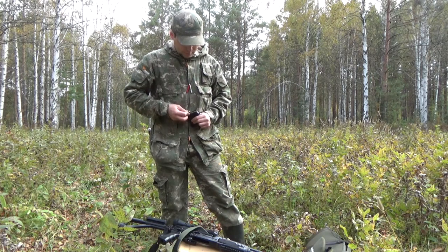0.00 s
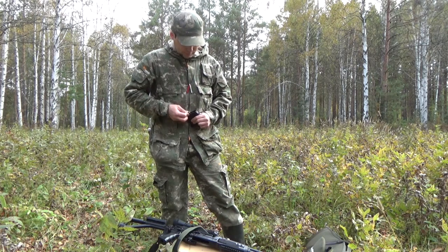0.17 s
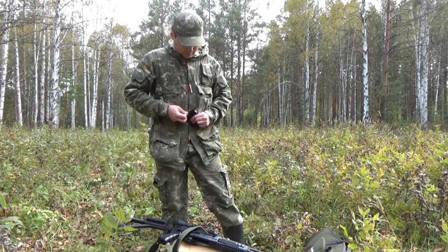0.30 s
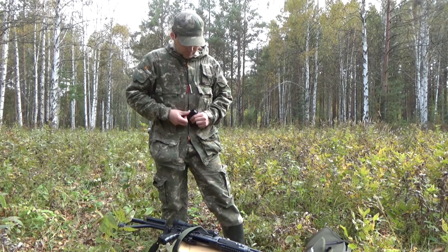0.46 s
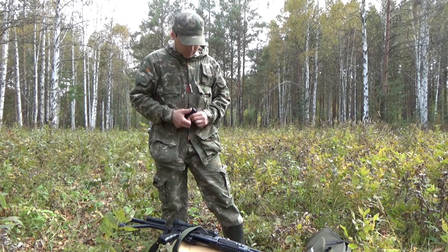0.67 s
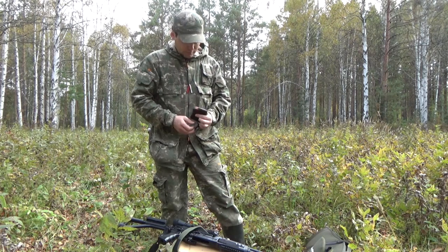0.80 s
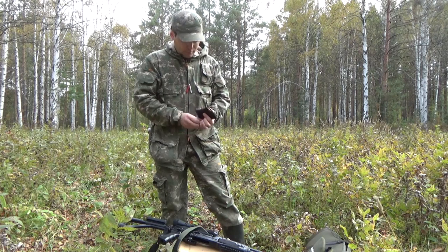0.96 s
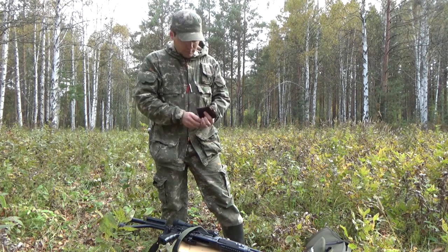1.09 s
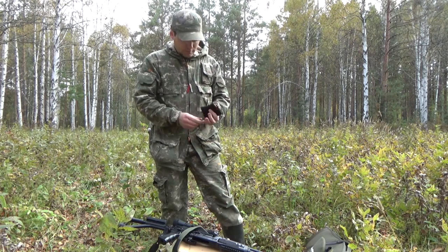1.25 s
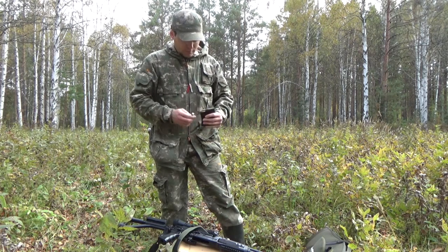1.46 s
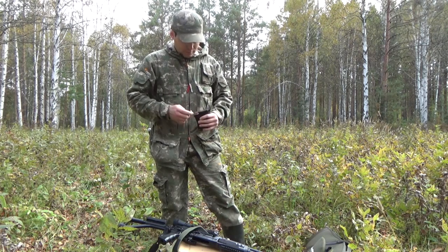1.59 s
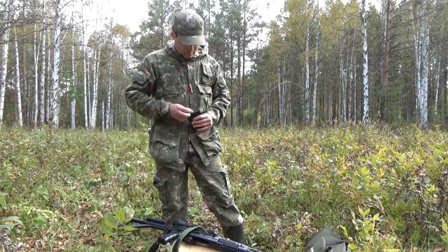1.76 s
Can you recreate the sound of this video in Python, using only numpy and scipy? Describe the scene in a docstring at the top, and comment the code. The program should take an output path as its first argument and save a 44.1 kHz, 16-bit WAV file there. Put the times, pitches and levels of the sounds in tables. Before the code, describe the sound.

A cartridge is loaded into a hand-held magazine: light taps and short scrapes from 0.07 to 0.32 s, a loud bright metallic snap at 0.43, another click near 0.55, and a tight cluster of dry clicks at 0.60-0.66. Sleeves rustle, strongest around 0.5-0.8. Barely audible contacts come at 1.0, 1.41 and 1.48. Faint wind, hiss and rapid tiny ticking continue throughout, with a slight woodland echo.

```python
"""Light wind murmurs far off, ticks run very faintly and sleeves rustle in a forest clearing throughout.
A rifle cartridge taps the feed lips of a hand-held magazine, scrapes, snaps under them and is pushed home
in a few dry clicks; three faint contacts follow. Contacts are treble cracks, damped metal modes and thuds;
scrapes, cloth, ticks and wind are shaped noise. Undergrowth and trees return a faint noise-tail echo."""
import sys
import numpy as np
from scipy import signal
from scipy.fft import rfft, irfft, next_fast_len
from scipy.io import wavfile
from scipy.ndimage import map_coordinates

SR = 44100
rng = np.random.default_rng(int(sys.argv[2]) if len(sys.argv) > 2 else 0)


def bounce(signal):
    """Save signal as a 16-bit WAV file at the path given by the first command-line argument."""
    frames = np.transpose(np.atleast_2d(signal))
    limited = np.clip(frames, -1, 1)
    pcm = np.round(limited * 32767).astype(np.int16)
    wavfile.write(sys.argv[1], SR, pcm)


N = 79380


def amp(db):
    """Decibels to gain."""
    return 10 ** (np.asarray(db) / 20)


def unit(x):
    """Scale to rms 1."""
    return x / np.sqrt(np.mean(x ** 2) + 1e-20)


def burst(x):
    """Scale a short sound to the energy of 2 ms at rms 1."""
    return x * np.sqrt(.002 * SR / (np.sum(x ** 2) + 1e-20))


def decay(t, t60_s):
    """Exponential fall of 60 dB in t60_s."""
    return np.exp(-np.log(1000) * t / t60_s)


def along(points, hz):
    """Interpolate (Hz, value) points on a log frequency axis."""
    point_hz, value = np.transpose(points)
    return np.interp(np.log(hz + 1), np.log(point_hz + 1), value)


def filtered(x, response):
    """Multiply the spectrum of x by a response of frequency."""
    n = x.shape[-1]
    padded = next_fast_len(2 * n)
    spectrum = rfft(x, padded) * response(np.fft.rfftfreq(padded, 1 / SR))
    return irfft(spectrum, padded)[..., :n]


def highpass(x, hz, order=3):
    """Causal Butterworth bass cut."""
    return signal.sosfilt(signal.butter(order, hz, "highpass", fs=SR, output="sos"), x)


def noise(spectrum, size=N):
    """Coloured noise of rms 1."""
    white = rng.standard_normal(size)
    return unit(filtered(white, lambda hz: amp(along(spectrum, hz))))


def wobble(knots_per_s):
    """Smooth random curve through random knots."""
    knots = rng.standard_normal(N // 8)
    return map_coordinates(knots, [np.arange(N) * knots_per_s / SR], mode="wrap")


def add(track, start_s, sound):
    """Mix a sound into a track."""
    part = track[max(0, int(start_s * SR)):][:len(sound)]
    part += sound[:len(part)]


def air():
    """Steady noise of distant wind in the trees, plus hiss; nearly mono in the bass."""
    # Wind and hiss spectrum. Each row: frequency in Hz, relative density in dB.
    wind_spectrum = [(18, -40), (29, -6), (48, -1), (80, 1), (130, -8), (200, -5.5), (350, -1), (700, -6),
                     (1400, -13.5), (2600, -20.5), (4000, -18.5), (7000, -23.5), (15000, -28.5)]
    # Stereo width. Each row: frequency in Hz, side gain in dB.
    side_gain = [(40, -34), (130, -16.5), (500, -10), (2000, 0), (7000, -4), (12000, -32.5)]
    mid_db = -59.5
    mid = noise(wind_spectrum)
    side = filtered(noise(wind_spectrum), lambda hz: amp(along(side_gain, hz)))
    return amp(mid_db) * np.array([mid + side, mid - side])


def faint_ticking():
    """Evenly spaced ticks, each a dying band of noise with a resonance-shaped spectrum."""
    # Tick trains. Each row: first tick in seconds, ticks per second, centre in Hz,
    # half-width over centre (at half amplitude), mean level in dB, t60 in seconds.
    trains = [(.017, 12.5, 3300, 0.16, -60.5, 0.02), (.017, 25, 4850, 0.026, -64, 0.06)]
    scatter_db = 1
    out, t = np.zeros(N), np.arange(SR // 20) / SR
    for first_s, per_s, centre_hz, width, level_db, t60_s in trains:
        white = rng.standard_normal(N)
        band = filtered(white, lambda hz: 1 / (1 + ((hz - centre_hz) / (width * centre_hz)) ** 2))
        envelope = np.zeros(N)
        for s in np.arange(first_s, N / SR, 1 / per_s):
            tick_db = level_db + scatter_db * rng.standard_normal()
            add(envelope, s, amp(tick_db) * burst(decay(t, t60_s)))
        out += envelope * unit(band)
    return out


def clearing(x):
    """Quick scatter from body and undergrowth, slower faint echo from the trunks: decaying noise tails."""
    # Echo colour. Each row: frequency in Hz, relative level in dB.
    echo_spectrum = [(200, -5), (1000, 3.5), (3000, -4.5), (9000, 2), (16000, -33)]
    near_db, near_t60_s = -24, 0.11
    trees_db, trees_t60_s, trees_rise_s = -32.5, 0.73, .05
    side_db = -5
    t = np.arange(SR) / SR
    near = decay(t, near_t60_s)
    trees = decay(t, trees_t60_s) * (1 - np.exp(-t / trees_rise_s))
    near *= amp(near_db) / np.linalg.norm(near)
    trees *= amp(trees_db) / np.linalg.norm(trees)
    envelope = np.hypot(near, trees)
    mid = signal.fftconvolve(x, envelope * noise(echo_spectrum, size=SR))[:N]
    side = amp(side_db) * signal.fftconvolve(x, envelope * noise(echo_spectrum, size=SR))[:N]
    return np.array([mid + side, mid - side])


def rustle():
    """Sleeve and finger friction: grainy cloth noise that swells and sinks with the hands."""
    # Level curve. Each row: time in seconds, level in dB.
    level_curve = [(0, -70), (.07, -64.5), (.13, -70), (.27, -61.5), (.37, -67.5), (.53, -56.5), (.6, -62),
                   (.69, -59.5), (.76, -56), (.83, -63.5), (.92, -66.5), (1.0, -61), (1.08, -63),
                   (1.15, -67.5), (1.38, -68), (1.46, -65.5), (1.56, -69), (1.8, -69.5)]
    # Cloth spectrum. Each row: frequency in Hz, relative level in dB.
    cloth_spectrum = [(200, -50), (800, 0), (3500, 4), (5500, -2), (8700, -1.5), (12000, -7),
                      (16000, -18.5)]
    grain_db = 0.5
    level_db = np.interp(np.arange(N) / SR, *np.transpose(level_curve))
    grain = amp(grain_db * wobble(350))
    return amp(level_db) * unit(noise(cloth_spectrum) * grain)


def scrapes():
    """Brass sliding along the feed lips: short swells of gritty noise."""
    # Slides. Each row: start in seconds, time to the start of the fall in seconds, level in dB.
    slides = [(0.094, 0.0045, -49.5), (0.22, 0.0082, -45.5), (0.279, .014, -46.5), (0.298, 0.022, -44),
              (0.434, 0.025, -42.5), (.612, 0.015, -45.5)]
    # Scrape spectrum. Each row: frequency in Hz, relative level in dB.
    scrape_spectrum = [(150, -32), (340, -13), (600, -11.5), (800, -0.5), (1150, 1.5), (1600, -6.5),
                       (3100, -1.5), (5500, -11), (8500, -13), (15000, -31)]
    rise_s, fall_s, grain_db = 0.0039, 0.0063, 2.8  # linear rise, fall time constant
    t = np.arange(N) / SR
    push = np.zeros(N)
    for start_s, length_s, level_db in slides:
        rise = np.clip((t - start_s) / rise_s, 0, 1)
        fall = np.exp(-np.maximum(t - start_s - length_s, 0) / fall_s)
        push += amp(level_db) * rise * fall
    grain = amp(grain_db * wobble(900))
    return push * unit(noise(scrape_spectrum) * grain)


def ring(modes, t, weight_db=0):
    """Damped modes of a struck object, their levels scattered at each blow."""
    scatter_db, attack_s = 2.3, .0001
    hz, db, t60_s = np.transpose(modes)
    gain = amp(db + weight_db + scatter_db * rng.standard_normal(len(hz)))
    waves = np.sin(2 * np.pi * hz[:, None] * t) * decay(t, t60_s[:, None])
    return burst(gain @ waves * (1 - np.exp(-t / attack_s)))


def clack(favoured_hz, focus_db_per_octave, semitones, t):
    """Held metal rings most strongly near the pitch the contact favours; the grip retunes it."""
    # Cartridge and magazine together. Each row: frequency in Hz before retuning,
    # relative level in dB, t60 in seconds.
    held_modes = [(780, -9.5, 0.024), (1037, -10, 0.014), (1126, 2.5, 0.021), (1480, -7.5, 0.011),
                  (1933, -2.5, 0.013), (2080, -4.5, 0.015), (2300, -29, 0.0124), (2800, 2, .014),
                  (3000, -9, .012), (3560, -11, .016), (3930, 3, .013), (4580, -17, 0.013),
                  (6160, -7, 0.018)]
    radiate_share = .35  # a brief hard contact gives little below this share of its pitch
    modes = np.array(held_modes) * [2 ** (semitones / 12), 1, 1]
    octaves_away = np.abs(np.log2(modes[:, 0] / favoured_hz))
    struck = ring(modes, t, -focus_db_per_octave * octaves_away)
    return burst(highpass(struck, radiate_share * favoured_hz))


def impulse(spectrum, size):
    """Minimum-phase pulse: the most compact causal one with this spectrum, via the folded cepstrum."""
    log_gain = np.log(amp(along(spectrum, np.fft.rfftfreq(2 * size, 1 / SR))))
    cepstrum = irfft(log_gain)
    cepstrum[1:size] *= 2
    cepstrum[size + 1:] = 0
    return irfft(np.exp(rfft(cepstrum)))[:size]


def crack(brightness_db_per_octave, t):
    """A hard edge lets go: one sharp impulse and a decaying splutter of treble."""
    # Crack spectrum before the brightness tilt. Each row: frequency in Hz, relative level in dB.
    crack_spectrum = [(120, -50), (500, -35), (1500, -15), (4500, 2), (5600, -2.5), (7400, 1.5), (9800, -3),
                      (11500, -11), (13800, -21), (16000, -30)]
    knee_hz, t60_s = 1800, 0.01  # the tilt starts at the knee
    snap_db = -6  # impulse relative to splutter
    tilted = [(hz, db + brightness_db_per_octave * np.log2(max(hz, knee_hz) / knee_hz))
              for hz, db in crack_spectrum]
    splutter = burst(noise(tilted, size=len(t)) * decay(t, t60_s))
    snap = burst(impulse(tilted, len(t)))
    return burst(amp(snap_db) * snap + splutter)


def clicks():
    """Contacts of cartridge and magazine: bright crack, short metal ring, thud of the magazine body."""
    # Contacts. Each row: start in seconds, ring level in dB, favoured pitch in Hz, fall-off from it
    # in dB per octave, grip retuning in semitones, crack level in dB, crack brightness in dB per octave,
    # thud level in dB, pan in dB (left up, right down by as much).
    contacts = [(0.0678, -49.5, 2000, 19, 0.42, -57, -7, -68, .3),
                (0.0987, -42, 1030, 9.5, -0.22, -50.5, -12, -50, .3),
                (0.2261, -33.5, 3600, 38, -1.7, -38, -6.5, -44.5, 0.6),
                (.2300, -30, 1050, 12, -0.077, -43.5, 0, -37, 0.8),
                (0.3009, -38.5, 2900, 14, 1.4, -58, -2, -49, 0.1),
                (.3183, -34.5, 1310, 3, 0.29, -47.5, -1, -46, .3),
                (.4230, -41.5, 2780, 0, 0.54, -48, -7, -66, -5),
                (.4320, -13, 3480, 20, 0, -20, 0.5, -55, .55),
                (0.452, -33.5, 3000, 18, 0.93, -46, 4, -35.5, -0.5),
                (0.5391, -42.5, 2330, 21, -0.57, -42.5, -10.5, -63, 4.5),
                (.5462, -23.5, 2690, 8.5, 0.69, -28.5, 11.5, -43.5, 0.37),
                (0.6024, -37.5, 2370, 17, 0.051, -52, 1, -58, 2.8),
                (0.6173, -24.5, 2800, 31, -1.7, -41, -9, -43, -0.5),
                (.6200, -19.5, 2055, 24, 0.71, -27.5, 6, -44, 0.6),
                (0.6209, -55, 2080, 16, 0.5, -23, 3, -45.5, 0.6),
                (0.63, -32, 1690, 40, 0.11, -50, 5, -45, 2.1),
                (.6520, -40.5, 1620, 5, -0.48, -66, 0, -56, 0),
                (0.6628, -27, 2220, 7, 1.35, -28, -3, -34.5, 0.4),
                (.9972, -52.5, 3600, 18, -1.4, -60, -6, -71, -0.5),
                (1.411, -51.5, 3380, 4, 1, -56, 12, -65, 0.8), (1.476, -55, 4530, 5, 1.2, -52, 8, -62, 0)]
    # Magazine body in the hand. Each row: frequency in Hz, relative level in dB, t60 in seconds.
    thud_modes = [(320, -8.5, 0.065), (400, 7.5, 0.024), (660, -3, 0.018)]
    radiate_hz = 248  # so small a body sends out little below this
    left, right, t = np.zeros(N), np.zeros(N), np.arange(SR // 20) / SR
    for start_s, ring_db, hz, focus, semitones, crack_db, brightness, thud_db, pan_db in contacts:
        sound = amp(ring_db) * clack(hz, focus, semitones, t)
        sound += amp(crack_db) * crack(brightness, t)
        sound += amp(thud_db) * ring(thud_modes, t)
        add(left, start_s, amp(pan_db) * sound)
        add(right, start_s, amp(-pan_db) * sound)
    return highpass(np.array([left, right]), radiate_hz)


def scene():
    """The hands work mostly just left of centre, in the open air."""
    pan_db = 0.5
    friction = (scrapes() + rustle()) * amp([[pan_db], [-pan_db]])
    hands = clicks() + friction
    return air() + faint_ticking() + clearing(hands.mean(axis=0)) + hands


def record(dry):
    """Sharp band limit: nothing passes above it."""
    top_hz = 15900
    return filtered(dry, lambda hz: hz < top_hz)


dry = scene()
out = record(dry)
bounce(out)
```